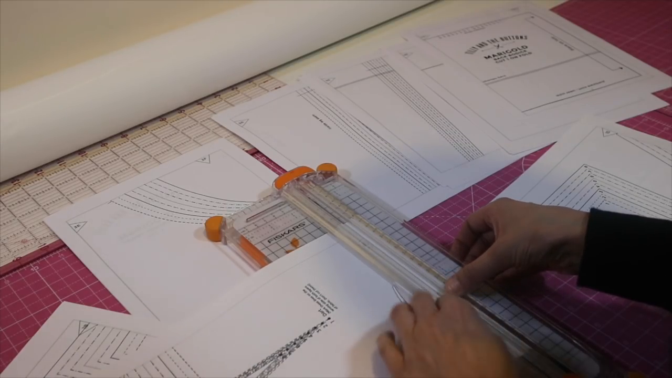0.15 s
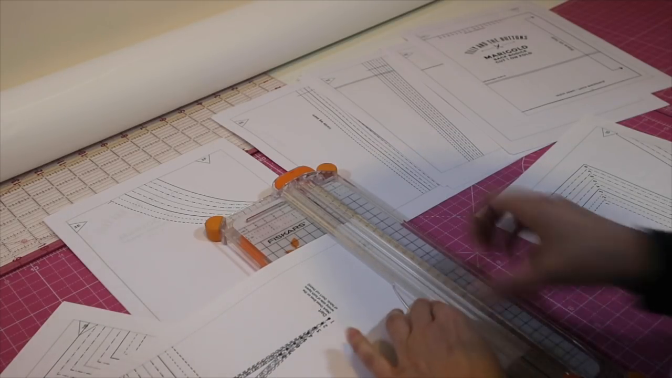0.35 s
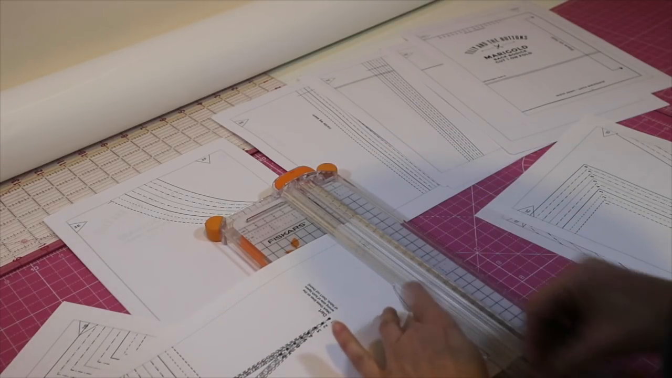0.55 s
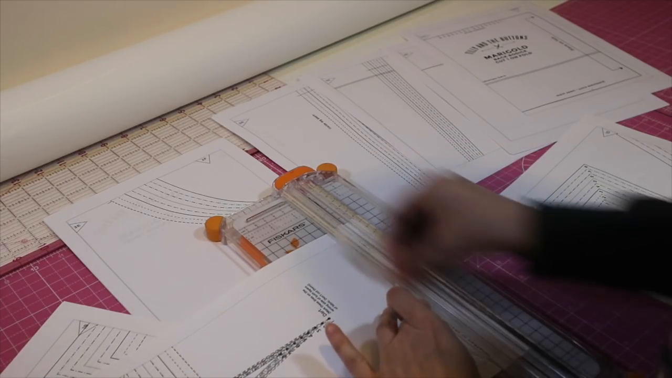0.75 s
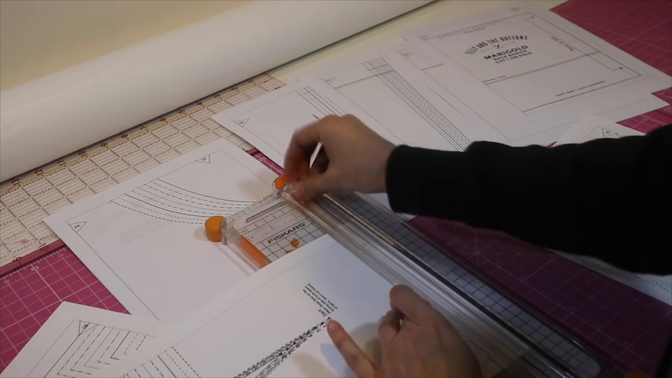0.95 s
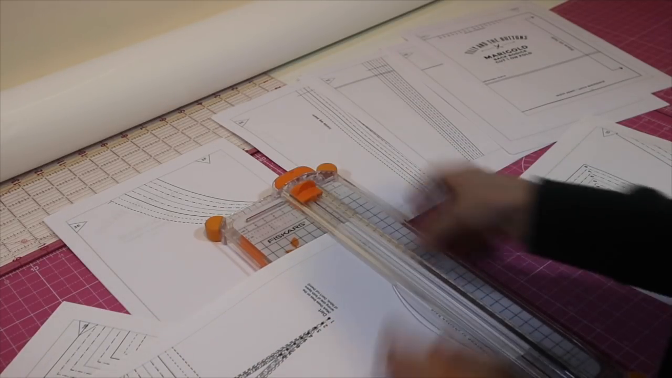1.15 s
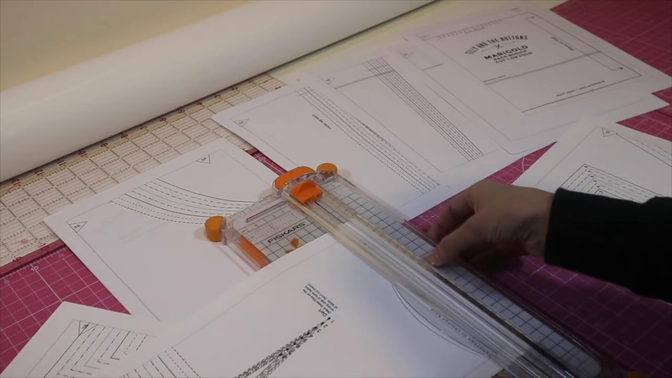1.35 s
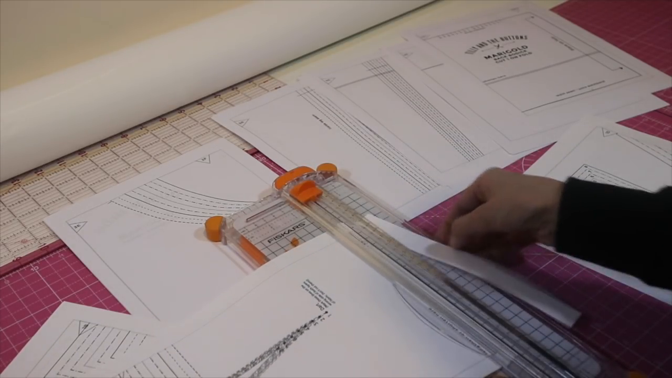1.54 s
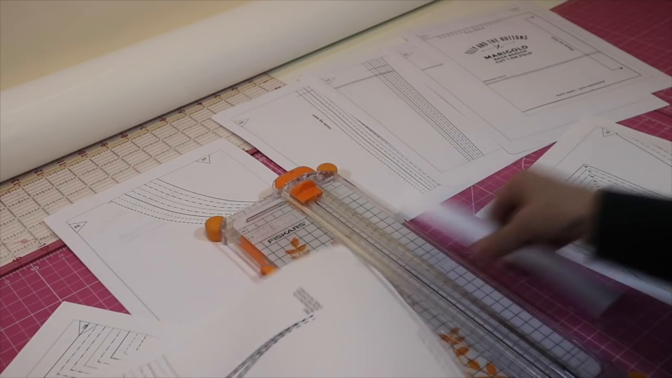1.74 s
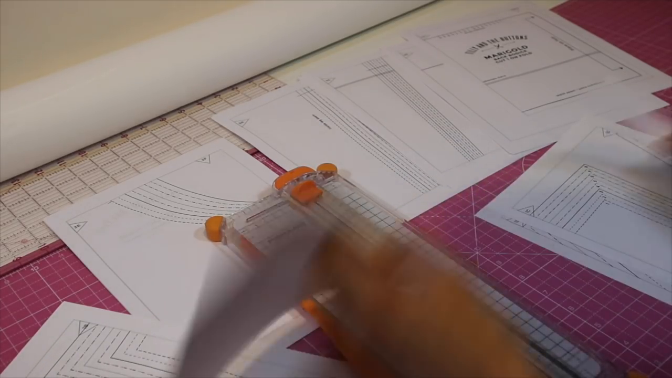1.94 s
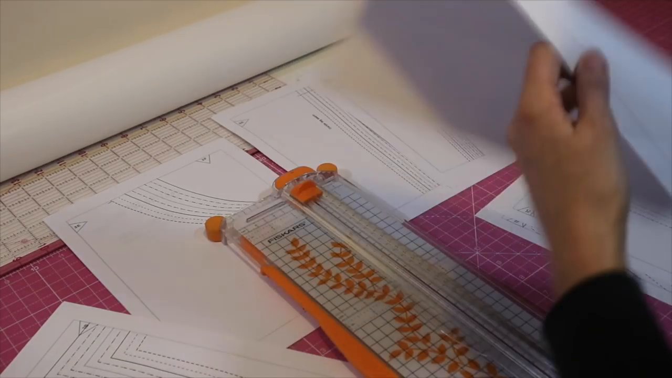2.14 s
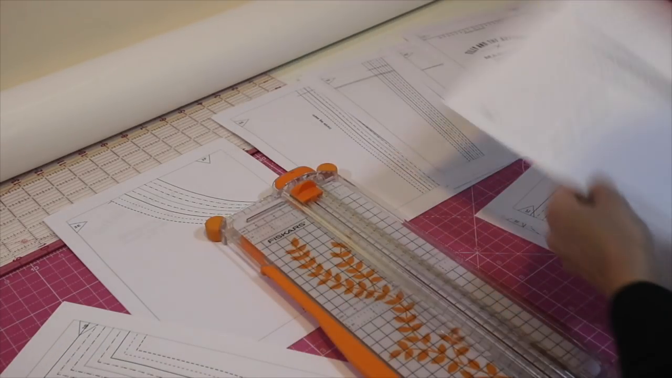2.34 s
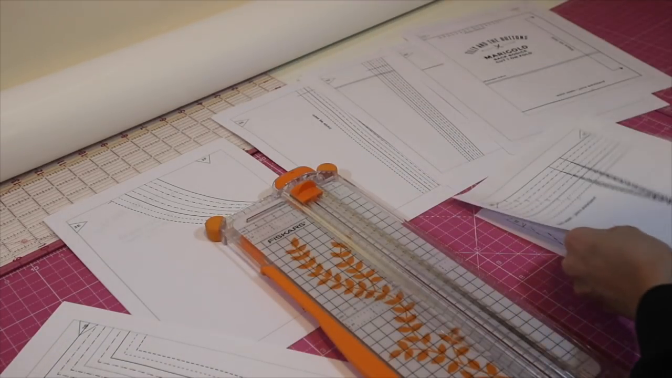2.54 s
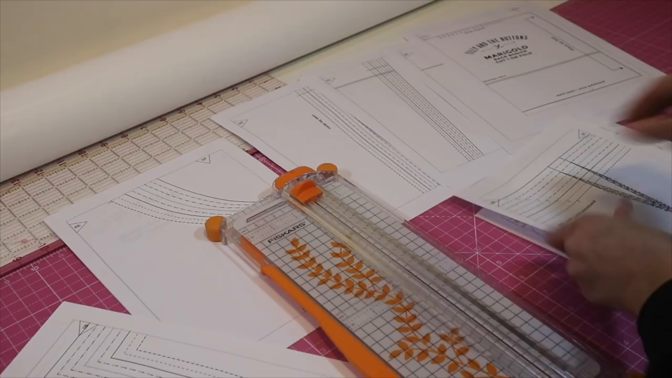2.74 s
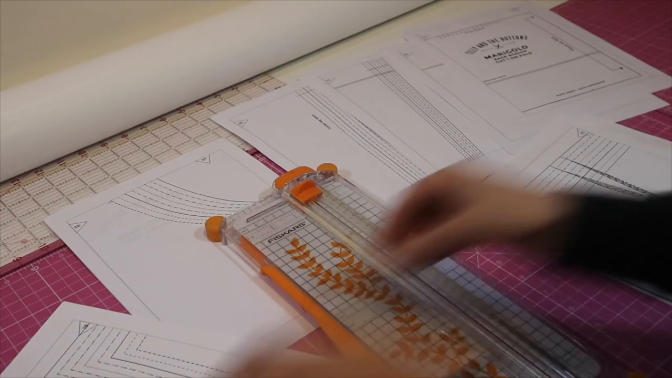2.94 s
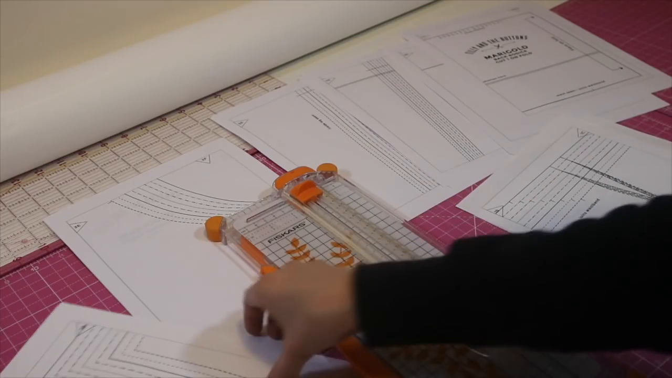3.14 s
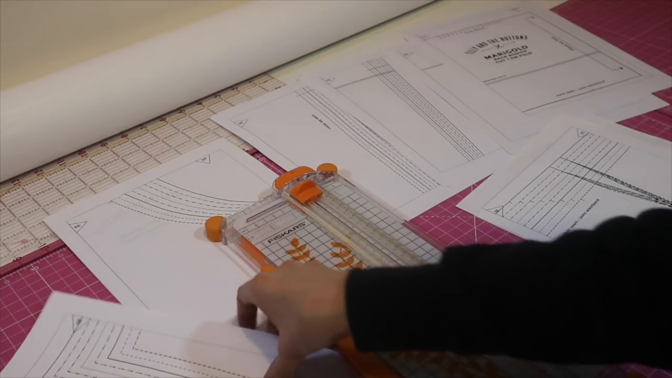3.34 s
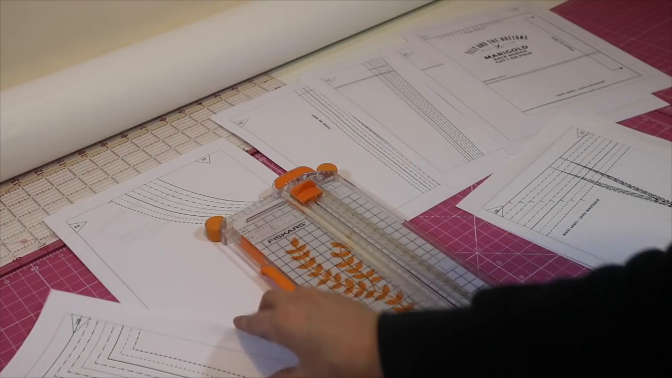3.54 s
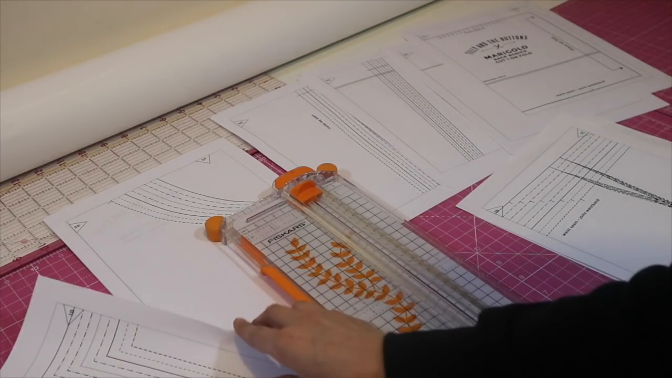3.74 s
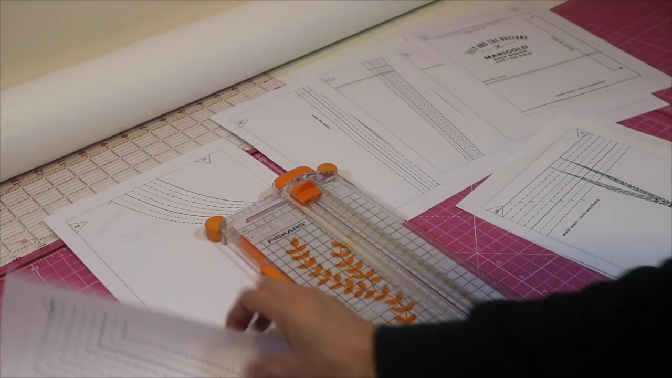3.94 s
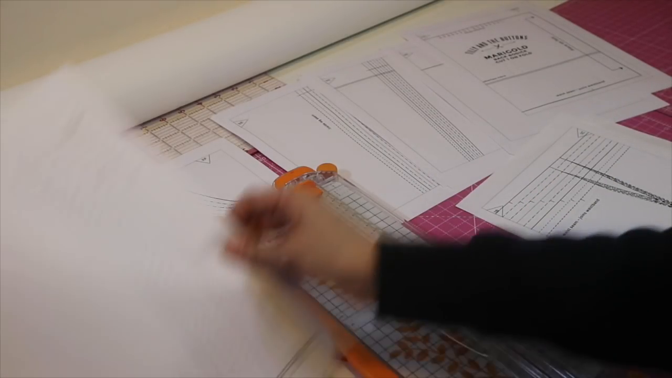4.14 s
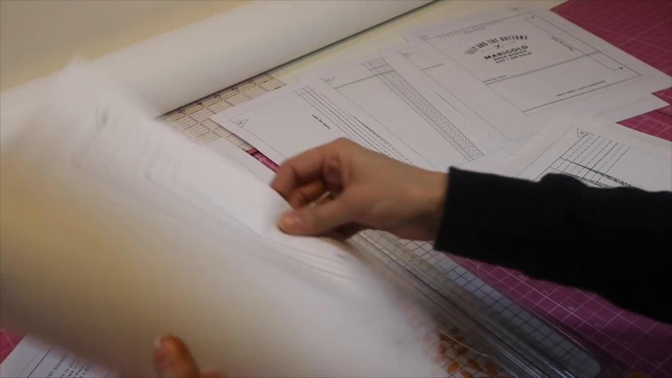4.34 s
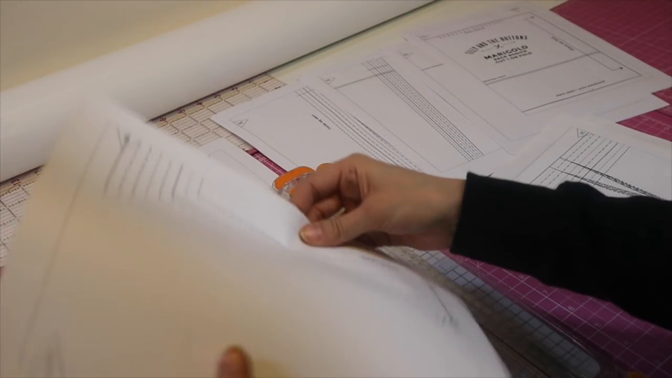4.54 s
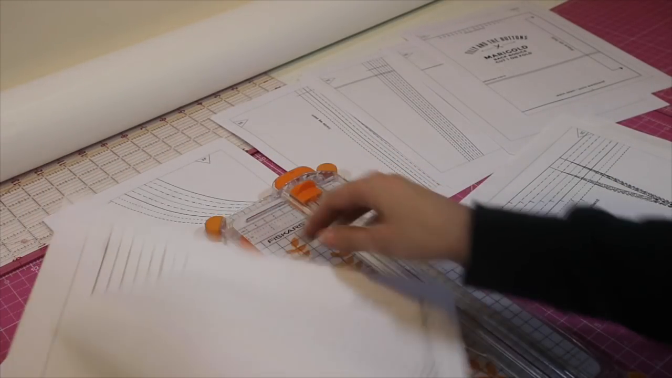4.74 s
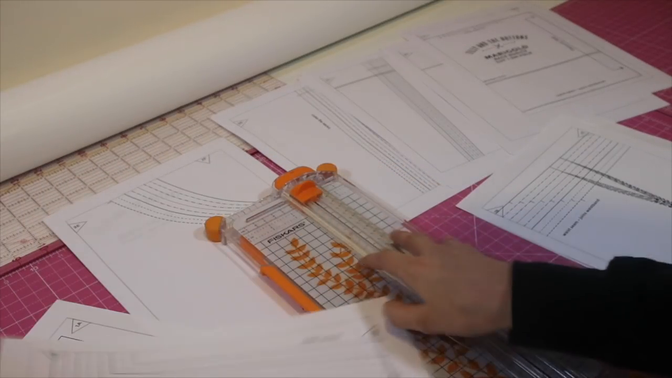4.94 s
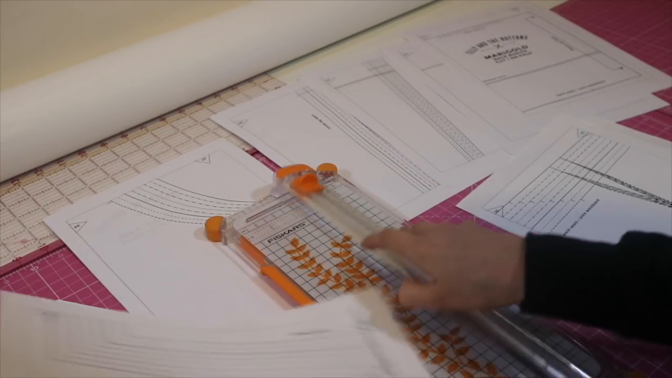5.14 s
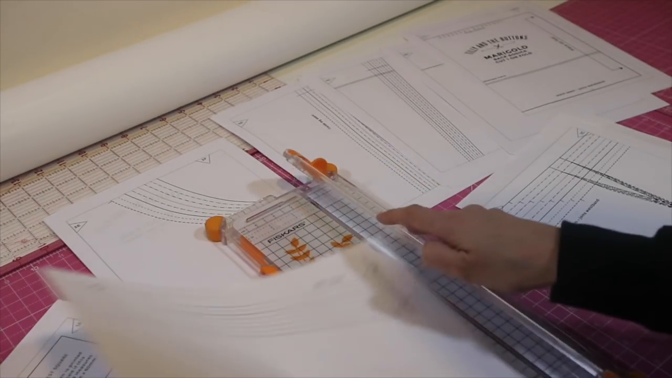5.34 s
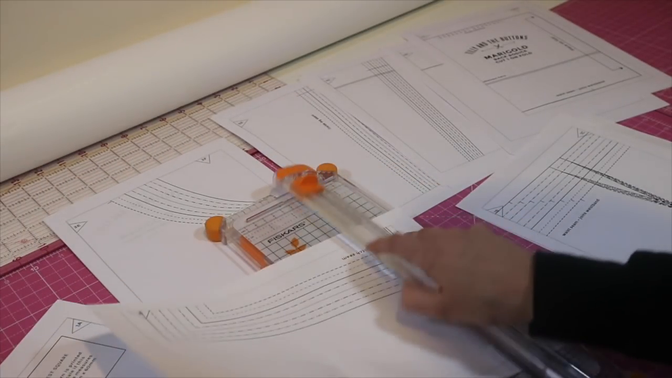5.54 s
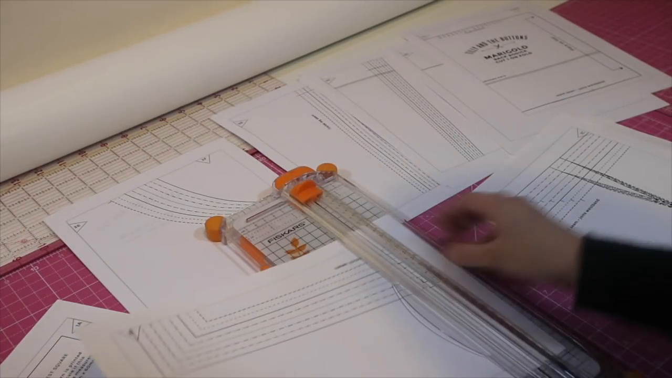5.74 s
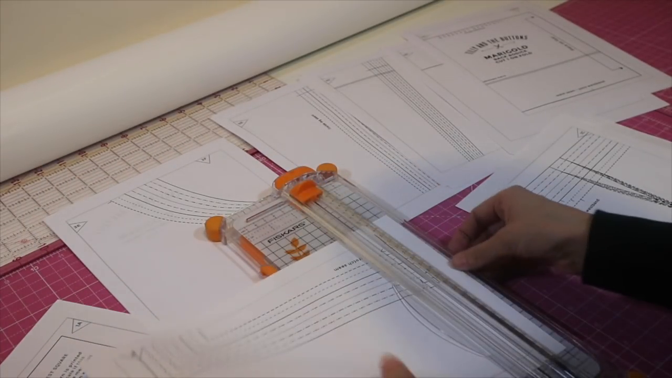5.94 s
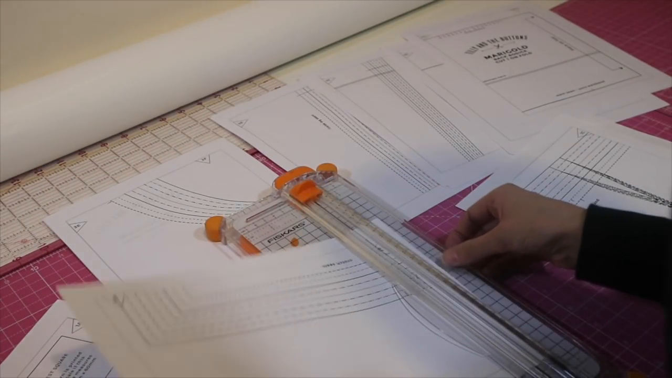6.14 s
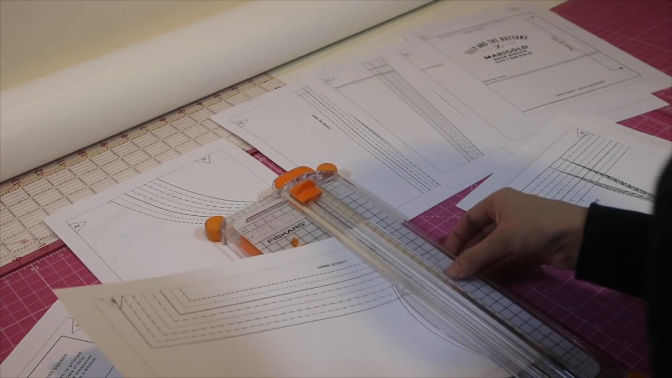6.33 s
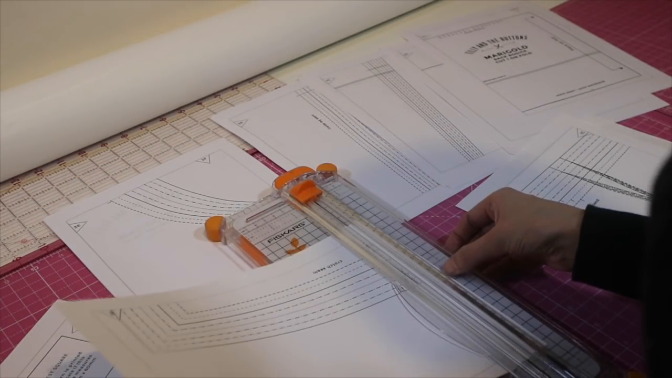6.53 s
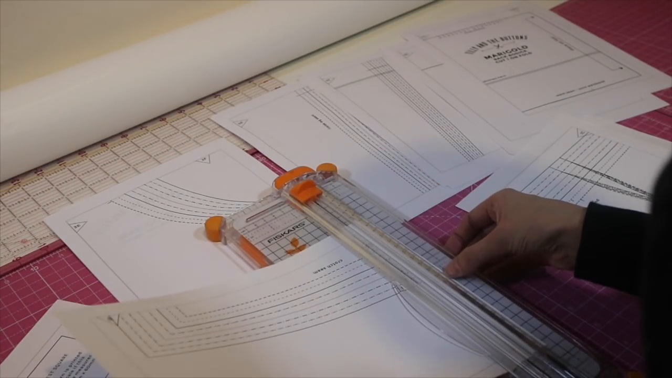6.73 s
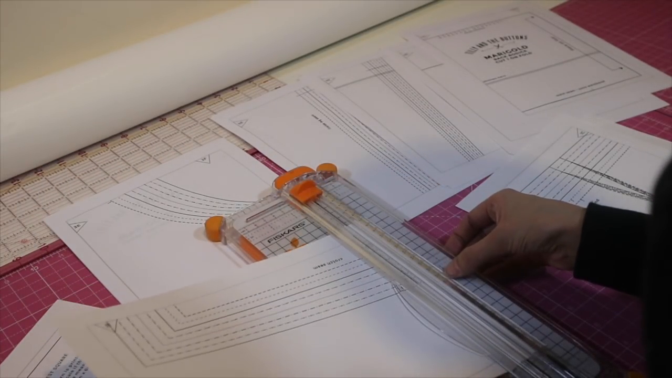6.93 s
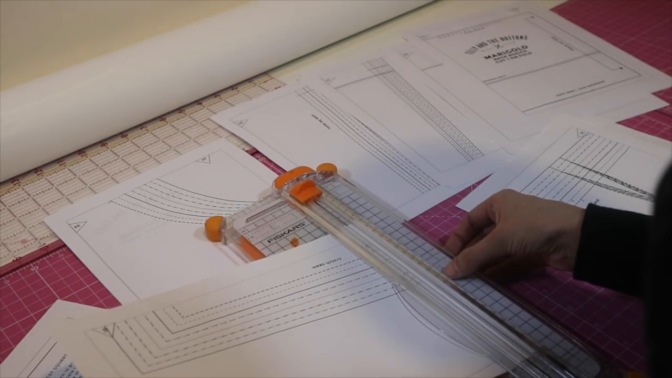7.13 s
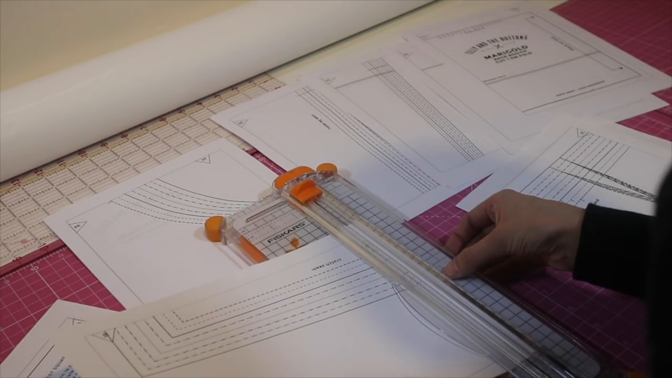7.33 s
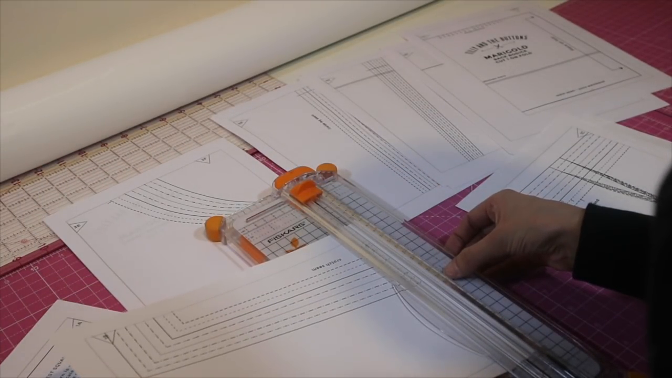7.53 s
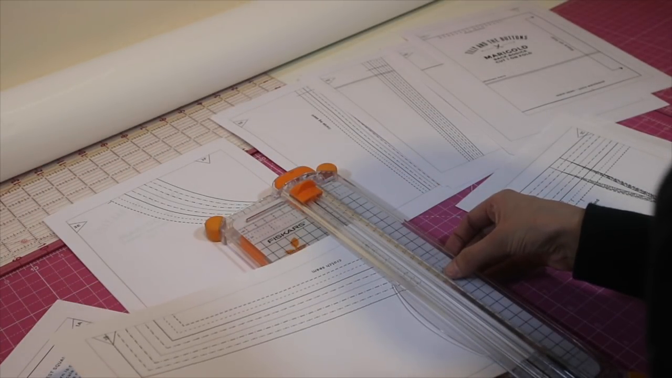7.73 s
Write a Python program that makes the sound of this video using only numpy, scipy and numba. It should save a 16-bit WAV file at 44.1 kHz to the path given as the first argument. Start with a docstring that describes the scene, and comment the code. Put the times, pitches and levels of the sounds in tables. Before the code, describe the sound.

Crisp paper handling with soft table knocks, two plastic claps and one short blade slide from a paper trimmer in a small room.

```python
"""Paper rustles softly on a table, over a low hum and a faint microphone hiss, in a small room.
Sheets are slid, lifted and bent over a plastic trimmer: their fibres slip in thousands of tiny clicks,
hands knock the table top and creases snap. The guide rail claps shut and the blade slides along it.
Later the handling grows louder, taut sheets pop from one bend to the other and the rail claps again."""
import sys
import numpy as np
from scipy import signal
from scipy.fft import rfft, irfft
from scipy.io import wavfile
from scipy.ndimage import uniform_filter1d
from numba import njit

SR = 44100
rng = np.random.default_rng(int(sys.argv[2]) if len(sys.argv) > 2 else 0)


def bounce(signal):
    """Save signal as a 16-bit WAV file at the path given by the first command-line argument."""
    frames = np.transpose(np.atleast_2d(signal))
    limited = np.clip(frames, -1, 1)
    pcm = np.round(limited * 32767).astype(np.int16)
    wavfile.write(sys.argv[1], SR, pcm)


N = 347508


def amp(db):
    return 10 ** (np.asarray(db) / 20)


def unit(x):
    return x / np.sqrt(np.mean(x ** 2))


def read_curve(table, column=1):
    """Read a table at every frequency of the spectrum."""
    rows = np.array(table, float)
    return np.interp(np.log(np.fft.rfftfreq(N, 1 / SR) + 1), np.log(rows[:, 0]), rows[:, column])


def colour(x, gain):
    return irfft(rfft(x) * gain, N)


def cut(x, order, hz, kind):
    return signal.sosfilt(signal.butter(order, hz, kind, fs=SR, output="sos"), x)


@njit
def band(x, hz, q):
    """Keep the sound near a steady or moving pitch; a higher q rings longer."""
    out, tuning = np.empty(len(x)), np.tan(np.pi * (hz + np.zeros(len(x))) / SR)
    mid, low = 0., 0.
    for i, g in enumerate(tuning):
        v = (mid + g * (x[i] - low)) / (1 + g * (g + 1 / q))
        mid, low = 2 * v - mid, low + 2 * g * v
        out[i] = v / q
    return out


def grains(per_s, spread_db):
    """Tiny random slips, a few much larger than the rest."""
    size = amp(spread_db * np.minimum(rng.exponential(size=N), 5))
    slips = (rng.random(N) < per_s / SR) * size * rng.standard_normal(N)
    return slips / np.sqrt(uniform_filter1d(slips ** 2, SR // 4) + 1e-12)


def flicker(per_s, db):
    """A multiplier that wanders randomly around 1."""
    step = int(SR / per_s)
    return amp(db * uniform_filter1d(np.repeat(rng.standard_normal(N // step + 1), step), step)[:N])


def place(track, start_s, peak_db, sound):
    i = int(start_s * SR)
    track[i:i + len(sound)] += amp(peak_db) * sound[:N - i] / np.abs(sound).max()


# Moves of the paper and blade: (time at full strength [s], swell [s], hold [s], fade [s],
# pitch [Hz], ring level [dB], scrape level [dB], body level [dB])
PAPER_MOVES = [(0.0, 0.0157, 0.0023, .06, 1368, -42.5, -79, -41.5),
               (0.32, 0.097, 0.0019, 0.076, 1054, -47.5, -66, -42),
               (0.539, 0.0152, 0.0087, .06, 2894, -31, -36, -37.5),
               (0.658, 0.207, 0.027, 0.034, 1513, -44.5, -57, -52),
               (0.69, 0.0094, .228, 0.03, 2505, -37, -43.5, -41.5),
               (0.83, 0.205, 0.03, 0.17, 1050, -34, -45.5, -36.5),
               (0.943, 0.0117, 0.0023, 0.14, 1400, -33.5, -50.5, -38.5),
               (1.103, 0.011, 0.0464, 0.04, 986.4, -57.5, -67, -52.5),
               (1.239, 0.0135, 0.021, 0.11, 893.6, -57.5, -71, -52),
               (1.359, 0.138, 0.0019, 0.06, 1034, -60.5, -65.5, -43),
               (1.441, 0.018, 0.187, .3, 2198, -50, -62, -53.5),
               (1.725, 0.216, 0.039, .05, 1906, -44, -57.5, -48.5),
               (1.787, 0.13, 0.0365, 0.14, 1903, -37, -52.5, -41.5),
               (1.866, 0.055, 0.0628, 0.14, 2350, -36.5, -51, -57),
               (1.982, 0.0185, 0.0134, 0.1, 2004, -39, -52.5, -42),
               (2.036, 0.054, 0.0215, 0.074, 1814, -35.5, -58.5, -38.5),
               (2.141, 0.067, 0.0317, .1, 1800, -39, -71, -47.5),
               (2.226, 0.14, 0.0129, .03, 2213, -34, -48.5, -48),
               (2.257, 0.039, 0.0073, 0.13, 1406, -28.5, -50.5, -34.5),
               (2.421, 0.0109, 0.051, 0.054, 1507, -29.5, -73, -34.5),
               (2.472, 0.011, 0.0098, 0.07, 1857, -15.5, -72.5, -31),
               (2.565, 0.0095, 0.034, 0.13, 1698, -30.5, -57.5, -40.5),
               (2.607, 0.071, 0.0108, .07, 2075, -30, -65.5, -52),
               (2.666, .008, 0.106, 0.12, 2364, -41.5, -57, -58.5),
               (3.19, 0.163, .002, 0.24, 1514, -45, -58, -53.5),
               (3.355, 0.187, 0.0576, 0.086, 2394, -54.5, -59.5, -48.5),
               (3.464, 0.041, 0.0315, .06, 2800, -47, -60.5, -53),
               (3.564, 0.154, 0.0337, 0.054, 2600, -46.5, -59, -56),
               (3.629, .04, 0.0208, .05, 2391, -47.5, -64.5, -54),
               (3.755, 0.132, 0.0076, 0.044, 2300, -39.5, -54.5, -49.5),
               (3.812, 0.0153, 0.0101, 0.053, 2506, -49.5, -70, -69.5),
               (3.872, 0.05, 0.0254, 0.23, 2506, -53.5, -60.5, -65),
               (4.025, 0.0592, 0.00204, 0.075, 2520, -34.5, -51, -47),
               (4.066, 0.0053, 0.021, .1, 2357, -39, -52.5, -42),
               (4.132, 0.129, 0.029, .1, 3100, -30.5, -41.5, -42),
               (4.19, 0.144, 0.0187, 0.092, 2804, -23.5, -36.5, -34),
               (4.244, 0.132, 0.0203, 0.14, 1875, -22.5, -63.5, -27),
               (4.361, 0.018, 0.015, .12, 2500, -16, -39.5, -20),
               (4.404, 0.062, 0.0042, 0.08, 2048, -18.5, -44, -28),
               (4.508, .12, .035, 0.15, 2400, -34, -48.5, -41),
               (4.68, .015, 0.025, 0.085, 1494, -25.5, -59.5, -33),
               (4.721, 0.101, 0.0243, 0.29, 2017, -31.5, -50, -34.5),
               (4.836, 0.0135, 0.0168, 0.22, 1792, -17, -51, -32.5),
               (4.88, 0.0564, 0.00406, 0.042, 2166, -14, -58.5, -40.5),
               (4.912, 0.0244, 0.0192, 0.066, 2050, -24, -45, -43),
               (4.984, 0.019, 0.115, 0.05, 1250, -39, -52.5, -40),
               (5.13, 0.0042, 0.0037, 0.1, 1704, -35.5, -65.5, -38.5),
               (5.225, 0.102, 0.0204, .08, 1907, -47.5, -64, -47),
               (5.445, 0.216, 0.0126, 0.1, 2174, -47, -59.5, -50.5),
               (5.559, 0.032, 0.025, 0.099, 2185, -48, -59, -49),
               (5.682, 0.0365, 0.00205, 0.084, 1190, -31, -40.5, -30.5),
               (5.866, 0.258, 0.0022, 0.077, 1970, -42.5, -52, -46.5),
               (5.942, 0.105, 0.172, 0.055, 1583, -49.5, -61.5, -49.5),
               (6.032, 0.0194, 0.032, 0.13, 1858, -37, -53, -39),
               (6.097, 0.0066, 0.024, 0.1, 1908, -26, -60, -37.5),
               (6.13, 0.0142, 0.016, 0.09, 1940, -23.5, -52, -33.5),
               (6.163, 0.0095, 0.009, 0.071, 2196, -25.5, -33, -35),
               (6.283, 0.11, 0.0262, .12, 1200, -56, -63.5, -52),
               (6.44, 0.26, 0.0508, 0.13, 2393, -47, -62.5, -57),
               (6.793, .6, 0.0021, 0.25, 1695, -62, -87.5, -63),
               (7.061, .11, 0.002, .27, 1550, -58.5, -73.5, -70)]


def paper_moves():
    """Each move swells, holds and fades. Gives the pitch and the strengths of ring, scrape and body."""
    slope_db, sag_octaves = 30, 0.32  # as a move fades, its ring drops and sinks in pitch
    stir_db, stir_hz, stir_end_s = (-70, -76.5, -66), 1400, 6.6  # hands are never quite still
    t = np.arange(0, N, 32) / SR
    time, swell, hold, fade, hz, *levels = np.array(PAPER_MOVES, float).T[:, :, None]
    rising = np.maximum(time - t, 0) / swell
    dying = np.maximum(t - time - hold, 0) / fade
    stir_drop = slope_db * np.maximum(t - stir_end_s, 0)
    powers = []
    for db, steepness, rest_db in zip(levels, (1, 0.91, 0.73), stir_db):
        move_db = db - steepness * slope_db * (rising + dying)
        powers.append(amp(np.vstack((move_db, rest_db - stir_drop))) ** 2)
    octaves = np.log2(hz) - sag_octaves * np.minimum(dying, 1)
    octaves = np.vstack((octaves, np.full(len(t), np.log2(stir_hz))))
    pitch = 2 ** np.average(octaves, axis=0, weights=powers[0])  # the loudest move counts most
    gains = [np.sqrt(power.sum(axis=0)) for power in powers]
    return [np.interp(np.arange(N) / SR, t, curve) for curve in [pitch] + gains]


def rustle(hz, ring_gain, body_gain):
    """Slipping fibres shake the sheet into a bright ring and a dull body; air flaps underneath."""
    hz = np.clip(hz * flicker(25, 0.83), 300, 6000)
    slips = grains(6000, 2.2)
    sheet = unit(band(band(band(slips, hz, 1.0), hz, 0.99), 0.984 * hz, 1.1))
    # patches of the bent sheet ring longer, at pitches that wander as the bend moves
    for ratio in (.7, 1.3):
        strength = amp(-11) * flicker(14, 5.2)
        patch_hz = np.clip(ratio * hz * flicker(9, 1.1), 300, 9000)
        sheet += strength * unit(band(slips, patch_hz, 14.0))
    sheet += amp(-14) * unit(band(grains(600, 2.2), np.clip(1.2 * hz, 300, 9000), 4.1))  # tiny creases
    body = unit(band(band(grains(3000, 0.84), 620, 0.49), 620, 0.7))
    flap = unit(band(band(grains(1100, 3.7), 200, 0.76), 200, 0.45))
    pressure = flicker(60, 1.8)
    paper = pressure * (amp(-5) * ring_gain * sheet + amp(-2.5) * body_gain * body)
    # the air follows the body slowly, with about half its swing in dB
    air_gain = amp(-32.5) * uniform_filter1d(body_gain, int(0.18 * SR)).clip(0) ** 0.5545
    return paper + air_gain * flicker(4.2, 1.7) * flap


# The tone of an edge scraping paper: (frequency [Hz], level [dB])
SCRAPE_TONE = [(1760, -13), (3000, -2.5), (3200, -4), (3780, -4.5), (5840, -15), (6860, -14.5),
               (9600, -31.5), (14100, -36), (16000, -34)]


def scrape(gain):
    """An edge rubs the paper with a dry hiss, at two spots on the sheet."""
    pressure = amp(5) * gain * flicker(21, 2.2)
    tone = amp(read_curve(SCRAPE_TONE))
    return [pressure * unit(colour(grains(9000, 1.5), tone)) for _ in range(2)]


# The tone of the microphone hiss: (frequency [Hz], level [dB])
HISS_TONE = [(50, -44.5), (85, -17.5), (123, -3), (249, -12), (303, -2.5), (331, -13), (697, -19),
             (887, -21), (2960, -23.5), (3610, -28.5), (9460, -35), (16000, -58)]
# How wide the hiss sounds: (frequency [Hz], side level above mid [dB])
HISS_WIDTH = [(60, -26.5), (110, -9), (200, -5.5), (380, 2.5), (700, 4.5), (1290, 5), (2380, 4),
              (4400, 5.5), (8120, 5.5), (15000, 8)]


def microphone_hiss():
    """Two microphones hiss. Mid is what left and right share; side is how they differ."""
    tone = amp(read_curve(HISS_TONE))
    mid = colour(rng.standard_normal(N), tone)
    side = colour(rng.standard_normal(N), tone * amp(read_curve(HISS_WIDTH)))
    return amp(-63.45) * np.array([mid, side]) / np.sqrt(np.mean(mid ** 2))


# How the hum rises and falls: (time [s], relative level [dB])
HUM_LEVELS = [(0.0, -61.5), (2.57, -65), (3.18, -64), (3.53, -58.5), (3.88, -60.5), (4.91, -61),
              (5.11, -62.5), (7.88, -62.5)]


def hum():
    """A low tone, roughened by noise near the same pitch."""
    hz, width_hz = 56.63, 26
    t = np.arange(N) / SR
    waver = unit(band(rng.standard_normal(N), hz, hz / width_hz))
    db = np.interp(t, *np.transpose(HUM_LEVELS)) + 3.5
    return amp(db) * (np.sin(2 * np.pi * hz * t) + 0.41 * waver)


def strike(blows, tones, scatter_db, db_per_octave, rattle_s):
    """Each blow rings an object's own tones, most of all near the pitch that the struck spot favours."""
    out, t = np.zeros(N), np.arange(SR // 5) / SR
    hz, db, ring_s = np.array(tones, float).T[:, :, None]
    chance = rng.standard_normal((len(blows), 2, len(tones), 1))
    rattles = rng.standard_normal((len(blows), SR // 40)) ** 3 * np.exp(-t[:SR // 40] / rattle_s)
    for (time, peak_db, contact_ms, spot_hz), (loud, detune), rattle in zip(blows, chance, rattles):
        gain = amp(db + scatter_db * loud - db_per_octave * np.abs(np.log2(hz / spot_hz)))
        waves = np.sin(2 * np.pi * hz * (1 + 0.025 * detune) * t)
        ring = np.sum(gain * amp(-60 * t / ring_s) * waves, axis=0)
        ring = signal.fftconvolve(ring, np.r_[1, 0.14 * rattle])  # loose parts chatter
        contact = np.hanning(3 + int(contact_ms * SR / 500))  # a longer touch sounds duller
        place(out, time, peak_db, np.convolve(ring, contact))
    return out


# Knocks on the table: (time [s], level [dB], contact [ms], favoured pitch [Hz])
TABLE_KNOCKS = [(0.217, -35.5, 0.65, 182), (0.296, -34, 0.85, 350), (0.532, -27.5, 1.25, 306),
                (1.104, -35, 1.33, 210), (1.148, -36, 1.25, 165), (1.228, -33, 0.44, 400),
                (1.241, -31, 0.337, 329), (1.342, -26.5, 0.7, 440), (1.556, -27.5, 0.176, 369),
                (1.73, -30.5, 1.55, 142), (1.768, -33, 2.9, 151), (1.805, -33.5, 1.42, 150),
                (1.982, -37, 0.4, 290), (2.254, -30.5, 0.55, 319), (2.465, -40.5, 1.2, 513),
                (3.143, -34, 0.6, 320), (3.169, -26.5, 0.2, 210), (3.198, -27.5, 0.57, 158),
                (3.226, -31, 0.87, 150), (4.06, -32, 0.58, 278), (4.139, -31, 0.84, 374),
                (4.349, -22, 1.34, 267), (4.679, -28, 0.75, 560), (4.958, -24, 0.72, 330),
                (5.668, -16.5, 0.865, 227.6), (5.695, -29.5, 1.77, 199), (5.715, -35.5, 2.6, 195)]
# The table top's own tones: (pitch [Hz], level [dB], time to fade by 60 dB [s])
TABLE_TONES = [(122, -7, 0.14), (157, 2, 0.11), (199, 0, 0.08), (274, -1, 0.07), (321, 5, 0.08),
               (380, 2.5, 0.05), (483, 4.5, 0.045), (640, 2, 0.04)]


def table_knocks():
    """Hands and trimmer bump the table top, which answers with low thuds."""
    return strike(TABLE_KNOCKS, TABLE_TONES, scatter_db=3, db_per_octave=8.5, rattle_s=0.02)


# Creases giving way: (time [s], level [dB], pitch [Hz])
CREASE_SNAPS = [(0.221, -39, 910), (0.252, -29.5, 892), (0.301, -31, 1043), (0.454, -45, 2150),
                (0.527, -26.5, 2500), (0.538, -9.5, 3060), (0.794, -16, 1011), (1.104, -25.5, 910),
                (1.285, -37, 600), (1.334, -31.5, 947), (1.473, -30, 2374), (1.789, -20.5, 1017),
                (1.791, -20.5, 2570), (1.847, -24, 1974), (1.987, -27, 2140), (2.244, -19, 1440),
                (2.265, -14, 1240), (2.418, -29, 986), (2.477, -16.5, 1690), (2.563, -24, 1220),
                (2.583, -22.5, 1400), (2.663, -22.5, 2395), (2.755, -30, 1810), (3.198, -23.5, 477),
                (3.268, -37, 2420), (3.308, -30.5, 2950), (3.357, -27, 3060), (3.474, -33.5, 2760),
                (3.589, -34.5, 2530), (3.644, -42, 1490), (3.728, -33.5, 2600), (3.777, -31.5, 2060),
                (4.014, -30, 2492), (4.063, -25.5, 2284), (4.082, -22, 1880), (4.353, -14.5, 2600),
                (4.367, -10.5, 2900), (4.372, -11, 2600), (4.397, -9.5, 1860), (4.414, -9.5, 2020),
                (4.449, -21, 2062), (4.471, -25.5, 2410), (4.694, -17, 892), (4.724, -16.5, 2280),
                (4.749, -21.5, 2103), (4.77, -21.5, 867.5), (4.803, -21, 916.7), (4.849, -7, 980),
                (4.941, -8, 2051), (4.953, -18, 1549), (4.982, -24, 870.3), (5.056, -25, 935),
                (5.127, -20, 1411), (5.167, -30.5, 1090), (5.212, -33, 1193), (5.286, -32.5, 696.8),
                (5.353, -34, 1396), (5.438, -35.5, 1950), (5.561, -29, 2353), (5.663, -25.5, 2262),
                (5.669, -7.5, 2263), (6.03, -28, 1660), (6.044, -25, 2680), (6.093, -26.5, 2210),
                (6.1, -22.5, 800), (6.128, -15, 872.7), (6.131, -12.5, 2320), (6.177, -19.5, 2500),
                (6.182, -21, 2480), (7.613, -49.5, 930)]


def crease_snaps():
    """A crease gives way in a spray of slips that rings the sheet around one pitch."""
    out, t = np.zeros(N), np.arange(SR // 12) / SR
    onset = 1 - np.exp(-(t / 0.00076) ** 2)
    front = 1 + amp(1.5) * np.exp(-t / 0.00066)  # the first slips are the strongest
    for time, db, hz in CREASE_SNAPS:
        ring_s = 0.045 / (hz / 1000) ** 0.061  # higher creases die a little sooner
        spray = rng.standard_normal(len(t)) * onset * front * amp(-60 * t / ring_s)
        ring = band(band(spray, hz, 2.7), hz, 0.94)
        edge = amp(-21) * band(spray, 1.3 * hz, 1.0)
        place(out, time, db - 0.5, ring + edge)
    return out


# The rail hitting its base: (time [s], level [dB], contact [ms], favoured pitch [Hz])
RAIL_CLAPS = [(.5328, -1, 0.028, 3000), (.5352, -4.5, .04, 3900), (5.6685, -6, 0.1, 2087)]
# The rail's own tones: (pitch [Hz], level [dB], time to fade by 60 dB [s])
RAIL_TONES = [(864, -5, 0.035), (1080, -1, 0.04), (1315, 4.5, 0.016), (1800, 6, .014), (2110, 7, 0.012),
              (2380, 5, 0.012), (2700, 7, .012), (3150, 7, 0.011), (3870, 8, .011), (4580, 7, .009),
              (5310, 4, .008)]


def rail_claps():
    """The plastic guide rail claps shut with a short, bright ring."""
    return strike(RAIL_CLAPS, RAIL_TONES, scatter_db=1.5, db_per_octave=12, rattle_s=0.0022)


def blade_slide():
    """The blade's holder judders along the rail and rings it; the blade hisses through the paper."""
    start_s, end_s = 0.7, 0.931
    t, slips = np.arange(N) / SR, grains(2300, 1.05)
    judder = np.zeros(N)
    for hz, db, ring_s in RAIL_TONES:
        resonance = signal.iirpeak(hz, hz * ring_s / 3, fs=SR)
        judder += amp(db) / np.sqrt(hz) * signal.lfilter(*resonance, slips)
    sliding = np.clip(np.minimum((t - start_s) / 0.045, (end_s - t) / 0.015), 0, 1)
    hiss = cut(grains(8000, 1.53), 4, 10000, "high")
    return sliding * flicker(41.16, 2) * np.array([amp(-39.5) * unit(judder), amp(-57) * unit(hiss)])


# Pops of a taut sheet: (time [s], level [dB], pitch [Hz], ringing [q])
SHEET_POPS = [(4.3745, -4, 2800, 1.6), (4.8505, -4, 1500, 1.1), (5.6698, -2, 1100, 2.5),
              (6.1603, -.5, 2200, 1.3), (6.1698, -1, 3200, 1.8), (6.171, -11, 1100, 1.5),
              (6.1726, -4, 3800, 1.6)]


def sheet_pops():
    """A taut sheet flips to its other bend: one sharp push, then a weaker rebound."""
    out, push = np.zeros(N), np.zeros(SR // 50)
    push[0], push[SR // 700] = 1, -.15
    for time, db, hz, q in SHEET_POPS:
        place(out, time, db - 1, band(band(push, hz, q), hz, 0.5))
    return out


def room_echo(sound):
    """A small room returns a short wash of echoes, as mid and side."""
    fade_s, mid_db, side_db = 0.18, -16, -29
    t = np.arange(SR // 2) / SR
    tails = rng.standard_normal((2, len(t))) * amp(-60 * t / fade_s) * (t > .004)
    tails = cut(tails, 1, 4700, "low")
    tails *= amp([[mid_db], [side_db]]) / np.linalg.norm(tails, axis=1, keepdims=True)
    return signal.fftconvolve(sound[None], tails, axes=1)[:, :N]


# How the two microphones differ: (frequency [Hz], side level above mid [dB], side's lead [radians])
MICROPHONE_PAIR = [(59.5, -26, 1.2), (130, -29, 1.2), (300, -30, .3), (600.6, -14, 0.087),
                   (1282, -15.5, .5), (2400, -25, .8), (4400, -7.5, 1.2), (8130, -3, 1.4),
                   (15250, 2.5, 1.7)]


def stereo_side(sound):
    """Two close microphones hear the bass alike and the treble differently."""
    lead = np.exp(1j * read_curve(MICROPHONE_PAIR, column=2))
    return colour(sound, amp(read_curve(MICROPHONE_PAIR)) * lead)


def scene():
    """Mix paper, table and trimmer with the room, into left and right."""
    hz, ring_gain, scrape_gain, body_gain = paper_moves()
    soft = rustle(hz, ring_gain, body_gain) + crease_snaps() + table_knocks()
    # limp paper and plastic give off little treble or deep bass; sharp claps and pops reach higher
    soft = cut(cut(soft, 3, 4857, "low"), 3, 140, "high")
    judder, blade_hiss = blade_slide()
    hard = cut(rail_claps() + judder + sheet_pops(), 3, [280, 7070], "band")
    scrape_here, scrape_there = scrape(scrape_gain)
    near = soft + scrape_here + hard + blade_hiss
    side = stereo_side(near + 1.2 * scrape_there)
    mid, side = np.array([near, side]) + room_echo(near) + microphone_hiss()
    mid += hum()
    return np.array([mid + side, mid - side])


def record(dry):
    """The loudest peaks are rounded off softly, and the recorder cuts the highest treble."""
    ceiling, top_hz = .93, 15900
    rounded = dry / (1 + np.abs(dry / ceiling) ** 6) ** (1 / 6)
    return signal.sosfilt(signal.ellip(12, .2, 95, top_hz, fs=SR, output="sos"), rounded)


dry = scene()
out = record(dry)
bounce(out)
```